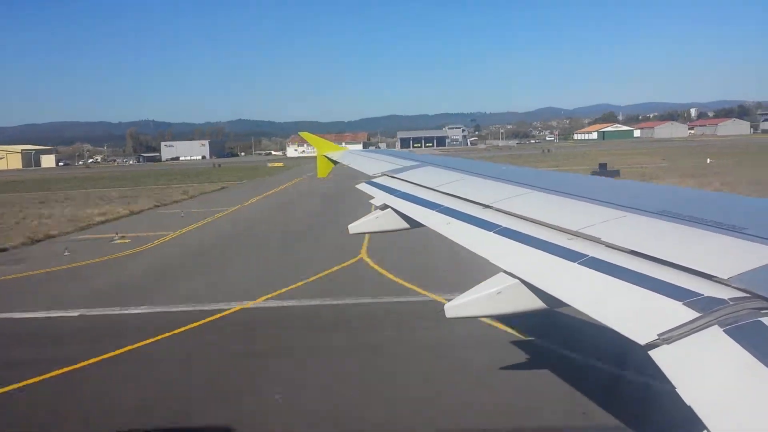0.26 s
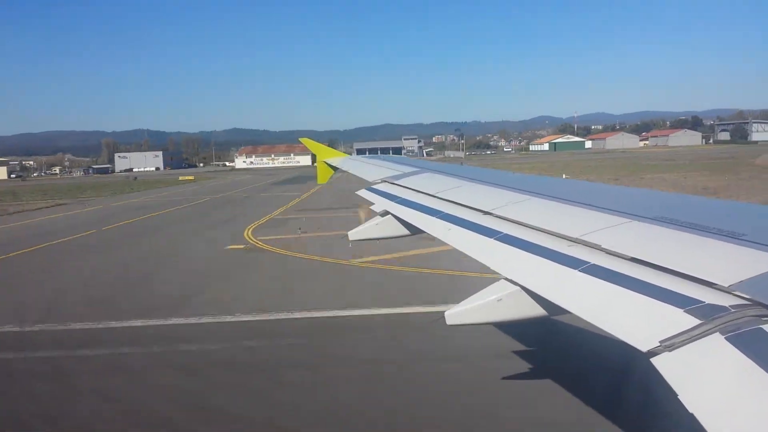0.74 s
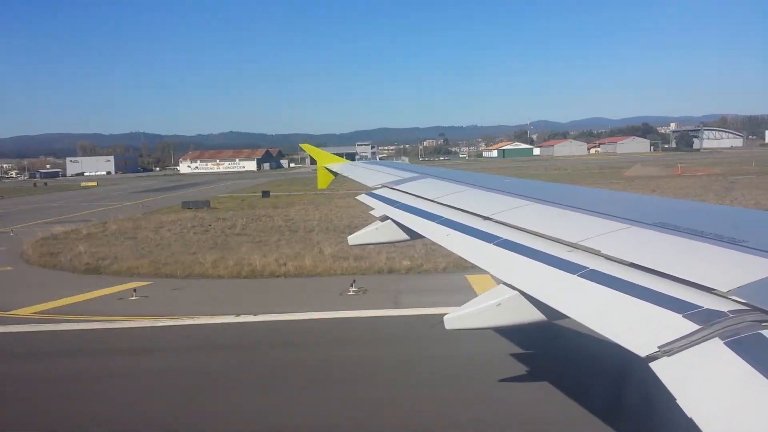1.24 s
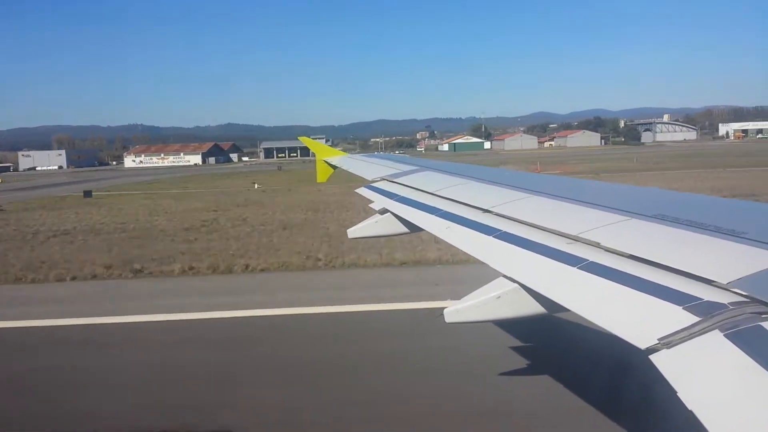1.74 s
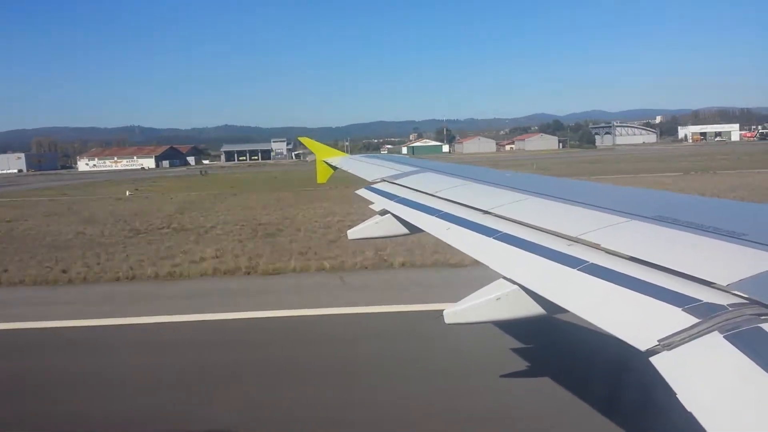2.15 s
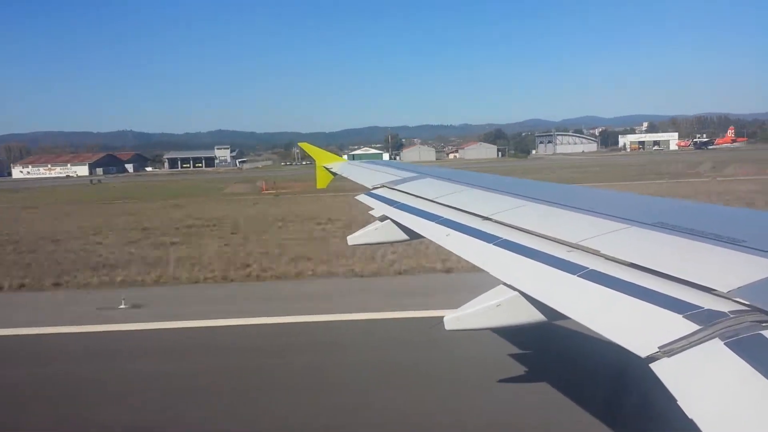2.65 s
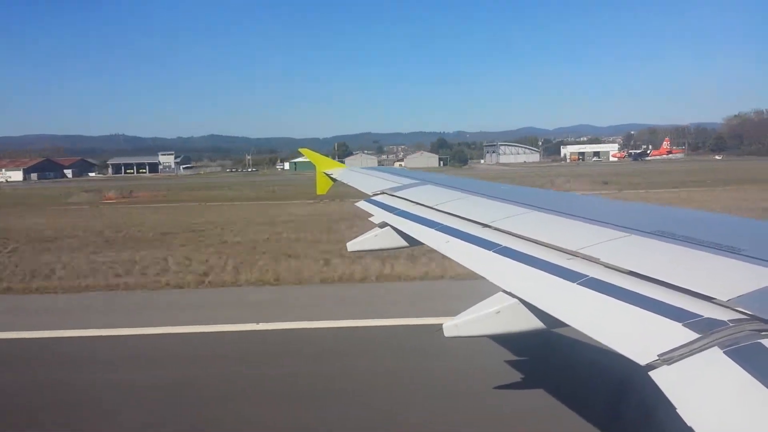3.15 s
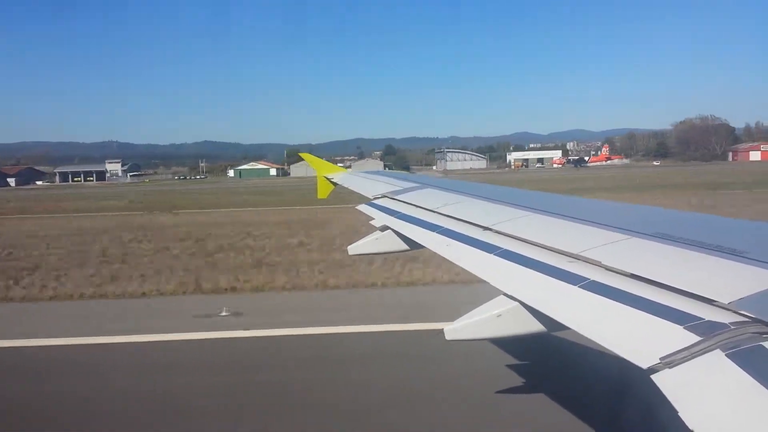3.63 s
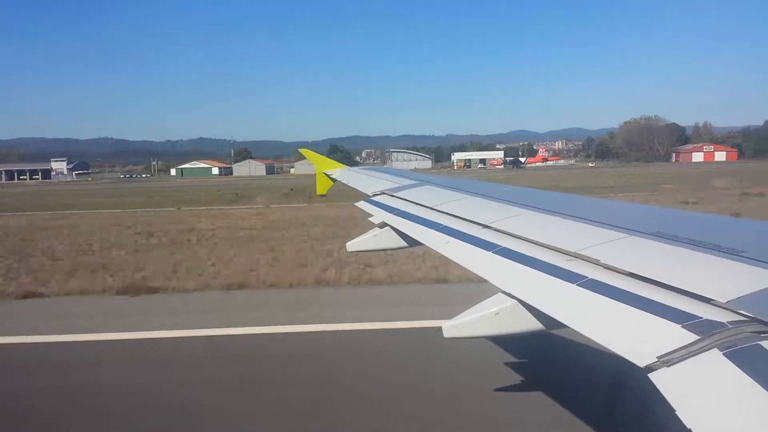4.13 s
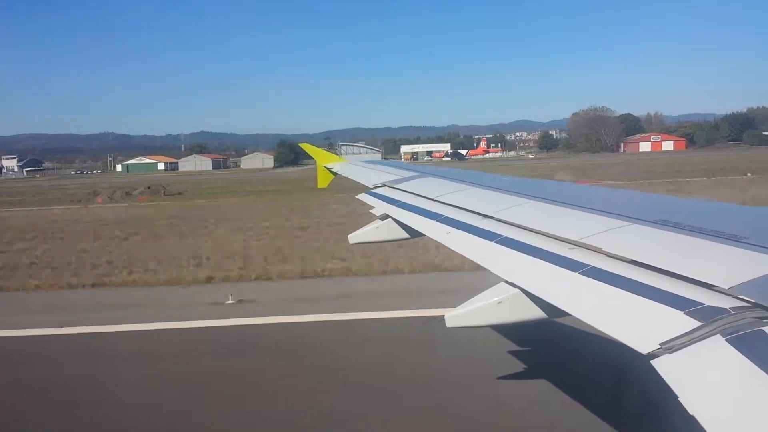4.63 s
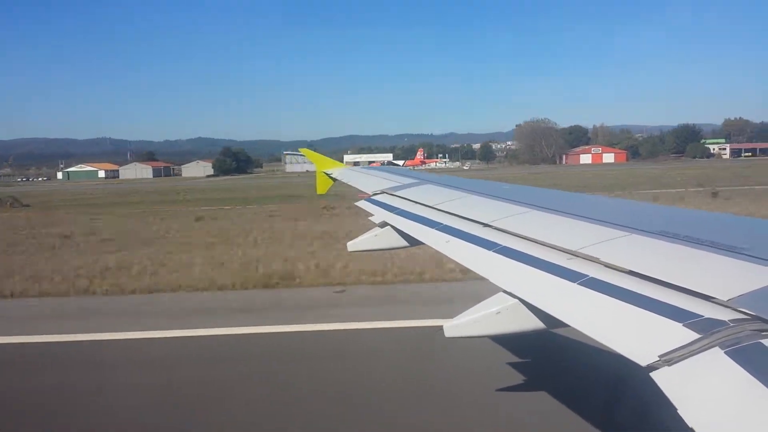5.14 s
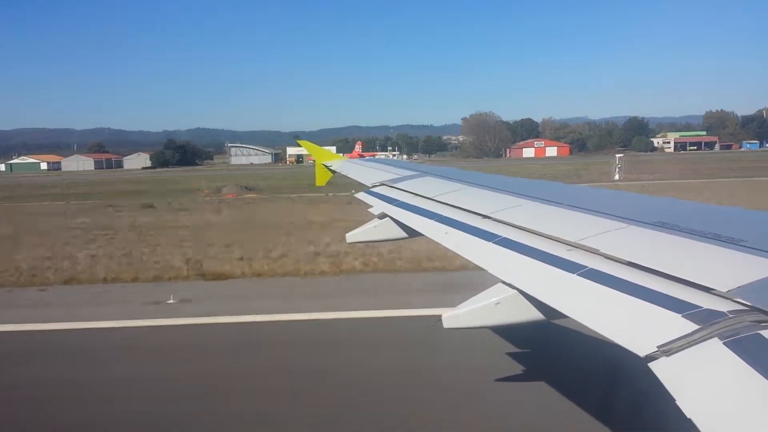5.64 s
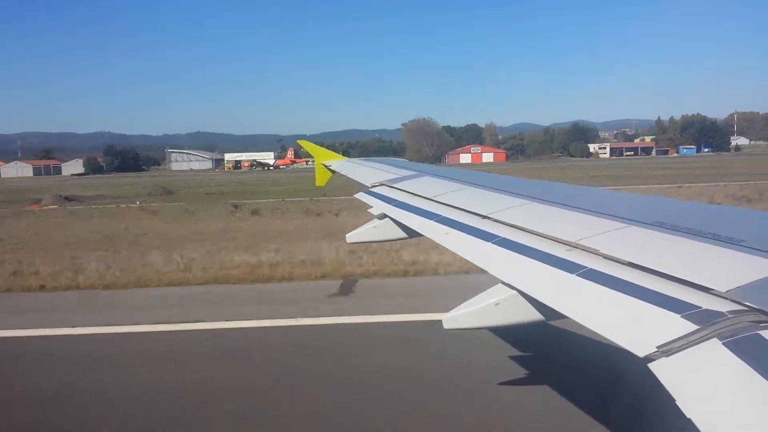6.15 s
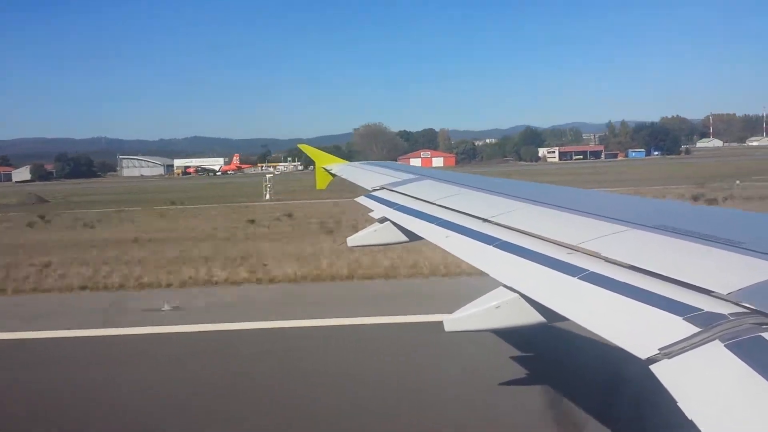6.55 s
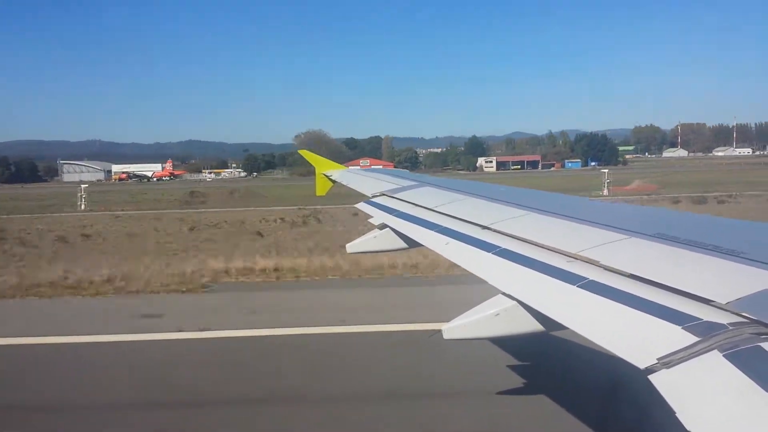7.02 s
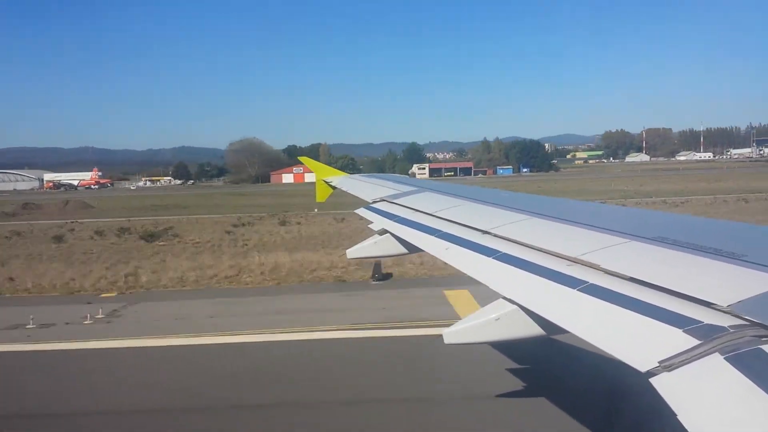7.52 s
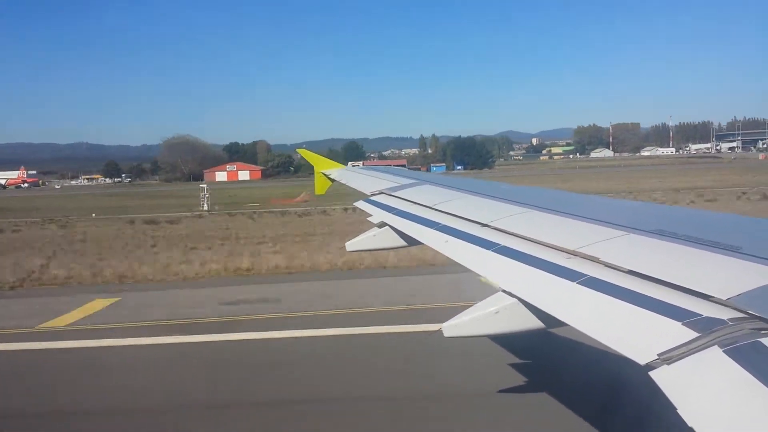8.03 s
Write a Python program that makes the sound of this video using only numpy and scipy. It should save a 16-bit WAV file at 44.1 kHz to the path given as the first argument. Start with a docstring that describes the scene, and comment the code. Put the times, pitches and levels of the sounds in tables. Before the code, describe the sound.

Inside an airliner cabin at a window over the wing during the take-off run. A loud, low roar of engines and wheels rumbles continuously, with soft air hiss and thin wavering whines. Close plastic trim snaps in quick, bright bursts during the first three seconds, eases to faint ticks, then snaps and creaks more sparsely to the end. Loose fittings rattle briefly now and then.

```python
"""Inside an airliner cabin during the take-off run, heard at a window over the wing.
From the start, filtered noise makes wheel rumble, cabin roar, resonant bands and air hiss; wavering sines whine.
Decaying modes make faint ticks of the plastic trim throughout, sharp snaps from 0.36 s and creaks from 0.59 s.
From 1.2 s loose fittings rattle now and then in short bursts of coloured noise.
Snaps and creaks pause from about 2.8 s to 4.4 s, then return until near the end."""
import sys
import numpy as np
from scipy import signal
from scipy.fft import rfft, irfft, next_fast_len
from scipy.io import wavfile
from scipy.ndimage import uniform_filter1d, minimum_filter1d, map_coordinates

SR = 44100
rng = np.random.default_rng(int(sys.argv[2]) if len(sys.argv) > 2 else 0)


def wav_out(sig):
    """Save sig, one row per channel (or a flat mono array), as 16-bit PCM at SR to the path in sys.argv[1]."""
    wavfile.write(sys.argv[1], SR, np.round(np.clip(np.atleast_2d(sig).T, -1, 1) * 32767).astype(np.int16))


N = 365148
TIME = np.arange(N) / SR
FREQ = np.maximum(np.linspace(0, SR / 2, next_fast_len(N // 2 + 1, real=True) + 1), 1)
TOP_HZ = 14800  # upper edge of the sound


def undb(db):
    """Decibel law: level to amplitude gain."""
    return 10 ** (np.asarray(db) / 20)


def unit(x):
    """Normalisation to a root-mean-square of 1 over all channels."""
    return x / np.sqrt(np.mean(x ** 2))


def sides(pan_db):
    """Interaural level difference: gains whose left minus right is pan_db."""
    return undb(np.array([[pan_db], [-pan_db]]) / 2)


def colour(hz, db, at=FREQ):
    """Spectral envelope: gain interpolated in decibels over log frequency."""
    return undb(np.interp(np.log(at), np.log(hz), db))


def noise(gain, channels=2):
    """Gaussian noise by spectral shaping: independent random spectra, multiplied by a gain."""
    shape = (channels, len(FREQ))
    spectrum = rng.standard_normal(shape) + 1j * rng.standard_normal(shape)
    return irfft(spectrum * gain)[:, :N] * np.sqrt(len(FREQ))


def walk(rate):
    """Random modulation of rms 1: random points joined by lines, about `rate` turns a second."""
    points = rng.standard_normal(N // 20)
    return unit(map_coordinates(points, [TIME * 2 * rate], order=1, mode="mirror"))


# Spectrum of engine and runway rumble through the fuselage: (frequency [Hz], relative level [dB per Hz])
FUSELAGE_SPECTRUM = [(12, -24), (22, -19), (33, -21.5), (49, -3.5), (125, -4), (180, -2), (250, -5),
                     (345, -10), (402, -19.5), (560, -20), (622, -27.5), (900, -38.5), (1100, -67),
                     (2000, -97)]
# Spectrum of the roar arriving from all round the cabin: (frequency [Hz], relative level [dB per Hz])
DIFFUSE_SPECTRUM = [(20, -19), (50, -6.5), (194, 6.5), (419, -1), (495, -3), (620, -3.5), (800, -9.5),
                    (1100, -9), (1500, -19.5), (2400, -77)]
# Uneven level of the rumble: (time [s], wheel level [dB], boom level [dB], roar level [dB])
RUMBLE_LEVELS = [(0, -22, -15, -14.5), (.25, -17.5, -12, -15.7), (.7, -16.9, -16, -15.5),
                 (1.2, -18, -12, -15), (1.55, -18, -14, -14.5), (2.25, -18.4, -12.5, -15.5),
                 (2.6, -19.5, -15, -17), (3.2, -17.5, -14.5, -17), (3.55, -17, -13.5, -14),
                 (4.2, -16.5, -12, -17), (4.6, -16.5, -12.5, -15.5), (4.95, -16, -14, -15),
                 (5.55, -18, -12, -15), (6, -17.5, -14, -14), (6.65, -15, -13, -16),
                 (7.05, -16, -13.5, -14.5), (7.5, -16.6, -13.5, -15), (8.28, -16.5, -17.5, -17)]


def roar(wheels_hz=110, split_hz=220, diffuse_db=-13.5, diffuse_pan_db=2, lean_db=3, lean_hz=520):
    """Diffraction and diffuse field: long waves reach both ports alike, shorter ones lean left and differ."""
    s, *levels_db = np.transpose(RUMBLE_LEVELS)
    wheel_gain, boom_gain, roar_gain = (undb(np.interp(TIME, s, db)) for db in levels_db)
    wall = colour(*np.transpose(FUSELAGE_SPECTRUM))

    # shares of the power below each crossover
    deep_share = 1 / (1 + (FREQ / wheels_hz) ** 10)
    low_share = 1 / (1 + (FREQ / split_hz) ** 10)
    lean = sides(lean_db) ** (1 / (1 + (lean_hz / FREQ) ** 10))

    # one channel of noise each: both ports hear the same wave
    wheels = unit(noise(wall * np.sqrt(deep_share), channels=1)) * wheel_gain
    boom = unit(noise(wall * np.sqrt(low_share * (1 - deep_share)), channels=1)) * boom_gain
    body = unit(noise(wall * np.sqrt(1 - low_share) * lean, channels=1)) * roar_gain
    around = unit(noise(colour(*np.transpose(DIFFUSE_SPECTRUM)))) * roar_gain * undb(diffuse_db)
    return wheels + boom + body + around * sides(diffuse_pan_db)


# Noisy resonances of the engine fan, the cabin and the air vents:
# (frequency [Hz], half width [Hz], level [dB], left minus right [dB], phase lead of the left port [rad])
RESONANCES = [(156, 9, -21.7, 0, 0), (181, 6, -29, 0, 0), (215, 10, -26, 0, 0), (281, 14, -25, -.5, .1),
              (505, 24, -38.5, 2, .9), (572, 14, -41, 3, -.2), (688, 10, -48.5, 5, -.5),
              (742, 16, -46.5, 6, -.7), (852, 32, -45, 5, -.1), (936, 16, -52.5, 4, -.4),
              (1050, 40, -55.5, 3, 3.1), (1170, 30, -54, 2, -.6), (1247, 37, -42.2, 0, -.6),
              (1420, 70, -56, 3, 2.8), (1550, 35, -61, 3, 2.9), (1665, 32, -58.5, 5, 1.5),
              (1900, 70, -60.5, 2, -2.4), (3180, 70, -67, -3, 0), (3480, 150, -64, -6, 0),
              (4850, 110, -65, -1, 0), (7290, 100, -63.5, -3, 0), (8450, 150, -65.5, -8, 0),
              (9760, 280, -60.5, -9, 0)]


def resonances(alike_hz=2400, most_apart=3, swell_db=.25, swell_rate=3.6):
    """Resonance and coherence: turbulence rings narrow bands, and the ports agree less as pitch rises."""
    out = 0
    for hz, width, db, pan_db, lead in RESONANCES:
        peak = 1 / (1 + ((FREQ - hz) / width) ** 2)
        shared = noise(peak * np.exp(1j * np.array([[lead], [0]])), channels=1)
        apart = min((hz / alike_hz) ** 2, most_apart)
        band = shared + apart * noise(peak)
        wavering = band * undb(swell_db * walk(swell_rate))
        out = out + unit(wavering) * undb(db) * sides(pan_db)
    return out


# Whines of spinning machinery: (frequency [Hz], level before swells [dB], left minus right [dB])
WHINE_TONES = [(1593, -60.5, 3), (2125, -68, 0), (2429, -62.5, -4.5), (7289, -69, -4)]
# Passing swells of a whine: (frequency of the whine [Hz], crest time [s], half length [s], rise [dB])
WHINE_SWELLS = [(1593, 0.3, .2, 8), (1593, 4.3, .17, 2), (1593, 5.9, .5, 9), (1593, 7.9, .2, 6),
                (1593, 7.72, .2, 5), (2429, 2.92, .12, 3), (2429, 3.45, .17, 9), (2429, 3.75, .17, 5),
                (2429, 4.5, .2, 6), (2429, 7.82, .17, 9.5)]


def whines(drift=0.0008, flutter_db=2.0, lag_rad=1.76):
    """Frequency and amplitude modulation: thin tones waver in pitch, swell, and flutter at each port."""
    out = 0
    lag = np.array([[lag_rad], [0]])  # the left port lags in phase
    for hz, db, pan_db in WHINE_TONES:
        phase = 2 * np.pi * np.cumsum(hz * (1 + drift * walk(22.6))) / SR
        flutter = undb(flutter_db * np.array([walk(5.5), walk(7.2)]))
        tone = np.sin(phase - lag) * flutter
        swell_db = 0
        for own_hz, crest, half, rise_db in WHINE_SWELLS:
            if abs(own_hz - hz) < hz / 10:
                swell_db = swell_db + rise_db * np.exp(-((TIME - crest) / half) ** 2)
        out = out + unit(tone) * undb(db + swell_db) * sides(pan_db)
    return out


# Spectrum of the cabin air before its level curve: (frequency [Hz], left [dB per Hz], right [dB per Hz])
AIR_SPECTRUM = [(400, -64.5, -75.5), (1000, -78, -84), (1670, -73, -78.5), (1780, -79.5, -79),
                (1970, -79, -78.5), (2920, -85, -84.5), (3060, -84.5, -82.5), (3990, -89, -87),
                (6070, -84, -90.5), (6900, -87, -85.5), (7730, -89.5, -86), (10890, -103, -88.5),
                (11460, -110, -102), (15000, -118, -112)]
# Level curve added to the hiss: (time [s], level [dB])
HISS_LEVEL = [(0, 2), (.9, 1.5), (2.6, 1.5), (3.15, -1), (3.5, 2.5), (4.3, 0.5), (5.8, 2.5), (7.1, 1),
              (7.8, 2.5), (8.28, -0.5)]


def air(flicker_db=1.34):
    """Broadband flow noise: ventilation and slipstream hiss, independent and coloured apart at each port."""
    hz, left_db, right_db = np.transpose(AIR_SPECTRUM)
    density = np.array([colour(hz, left_db), colour(hz, right_db)])
    hiss = noise(density) * np.sqrt(SR / 2)  # level per Hz to amplitude over the whole band
    return hiss * undb(np.interp(TIME, *np.transpose(HISS_LEVEL)) + flicker_db * walk(27))


# Modes of the trim before scatter: (frequency [Hz], 60 dB decay time [s], left level [dB], right level [dB])
PLASTIC_MODES = [(2100, 0.0024, -14, -3), (3250, 0.0058, -20, -9), (4390, 0.0069, -20, -9),
                 (5200, 0.0012, 0.5, -23), (6270, 0.0021, -0.5, -16), (7400, 0.0023, -20, 6.5),
                 (8440, 0.00087, -6, 7), (9640, 0.0019, -27, 6.5), (11040, 0.0015, -18, -7),
                 (13000, 0.0018, -13, -6), (14300, .002, -16, -21)]


def slip(scatter_db=1.2, detune=0.012, spot_shift=.015, tail_db=-24, tail_s=0.0012, radiate_hz=3600):
    """Modal decay: a release of stuck plastic rings its modes, and nearby surfaces scatter a short tail."""
    t = TIME[:SR // 50]
    hz, t60, *port_db = np.transpose(PLASTIC_MODES)
    mode_detune, mode_scatter = rng.standard_normal((2, len(hz)))
    # the spot that slips shifts all modes together
    hz = hz * (1 + detune * mode_detune + spot_shift * rng.standard_normal())
    decay = np.exp(-np.log(1000) * np.outer(1 / t60, t))
    rings = np.sin(2 * np.pi * np.outer(hz, t)) * decay
    polarity = (-1) ** np.arange(len(hz))
    direct = undb(np.array(port_db) + scatter_db * mode_scatter) * polarity @ rings
    # so small a part radiates little below its modes
    direct = signal.lfilter(*signal.butter(2, radiate_hz, "high", fs=SR), direct)
    scatter = rng.standard_normal(direct.shape) * np.exp(-t / tail_s) * undb(tail_db)
    click = direct + signal.fftconvolve(direct, scatter, axes=1)[:, :len(t)]
    return click / np.sqrt(np.sum(click ** 2))  # unit energy over both ports


def add(out, sound, s):
    """Superposition: mix a short sound in at time s."""
    start = int(np.clip(s * SR, 0, N - 1))
    out[:, start:start + sound.shape[1]] += sound[:, :N - start]


def ticks(faint_db=-26, spread_db=-2.0, count=60):
    """Random shot process: faint single slips fall at uniform random times as the cabin shakes."""
    out = np.zeros((2, N))
    for _ in range(count):
        gain = undb(faint_db + spread_db * rng.standard_normal())
        add(out, slip() * gain, rng.uniform(0, N / SR))
    return out


# Sharp snaps of the trim, alone or in quick runs: (time [s], energy level [dB])
SNAP_EVENTS = [(.3583, -10), (.3656, -11), (.3748, -14), (.3781, -14), (.403, -13), (.4069, -12),
               (.4099, -7), (.4162, -13), (.4217, -11), (.4264, -12), (.4352, -14), (.4392, -13),
               (.4522, -13), (.4637, -12), (.466, -7), (.4743, -13), (.4835, -9), (.5387, -13),
               (0.566, -5.5), (.5692, -9), (.5731, -5), (.5803, -12), (.6017, -11), (.7183, -11),
               (0.7296, -9), (.7336, -15), (0.738, -8), (.7433, -13), (.7466, -14), (0.773, -10),
               (.7774, -12), (0.7803, -5), (.7873, -5), (.7942, -9), (.8095, -9), (.9902, -15),
               (.9973, -13), (1.0001, -12), (1.0077, -14), (1.0357, -12), (1.0434, -11), (1.0543, -16),
               (1.5202, -10), (1.5268, -8.5), (1.6092, -7), (1.7925, -12), (1.8232, -16), (1.8305, -15),
               (1.84, -6), (1.8697, -11), (1.8793, -11), (1.8965, -5), (2.0568, -7), (2.0676, -8),
               (2.0763, -7.5), (2.08, -5), (2.0899, -11), (2.0934, -9), (2.1292, -4), (2.2301, -7),
               (2.2451, -7), (2.249, -11), (2.2525, -5), (2.2569, -8), (2.2606, -10), (2.269, -7),
               (2.3114, -15), (2.5348, -15), (2.5427, -4), (2.552, -15), (2.5595, -14), (2.5724, -10),
               (2.6018, -12), (2.6235, -12), (2.691, -6.5), (2.708, -11), (4.4674, -13), (4.6135, -7),
               (4.619, -10), (4.6216, -4.5), (4.7641, -14), (4.8204, -15), (5.5158, -11), (5.5227, -13),
               (5.5338, -15), (5.66, -13), (5.6769, -17), (5.6917, -14), (5.8305, -19), (5.8625, -14),
               (6.0545, -12), (6.0603, -11), (6.2461, -12), (6.2542, -14), (7.309, -10), (7.6629, -6),
               (7.6672, -14), (7.671, -10), (7.7707, -14), (7.9579, -12), (7.9654, -13)]


def snaps(after_db=-17, after_s=0.0022):
    """Sudden strain release: the strongest slips, each followed by a faint rebound."""
    out = np.zeros((2, N))
    for s, db in SNAP_EVENTS:
        add(out, slip() * undb(db), s)
        delay = after_s * np.exp(rng.standard_normal() / 2)
        add(out, slip() * undb(db + after_db), s + delay)
    return out


# Creaks of the trim, each a run of slips:
# (start [s], length [s], energy level of the first slip before random spread [dB])
CREAK_RUNS = [(0.59, .026, -23), (1.8, .063, -21), (2.282, .03, -18), (2.717, .017, -18), (4.77, .02, -21),
              (4.816, .04, -18.5), (5.307, .002, -24), (5.496, .047, -22), (5.62, .02, -22),
              (5.672, .03, -18), (5.824, .025, -21.5), (5.879, .02, -21), (6.014, .03, -22),
              (6.108, .025, -20), (6.229, .028, -18), (7.34, .008, -15), (7.369, .04, -18),
              (7.754, .029, -21), (7.928, .018, -20)]


def creaks(after_db=-11, after_s=0.0036, count=12):
    """Stick-slip friction: an uneven run of up to `count` weakening slips, each setting off a fainter one."""
    gap_s, jitter = .0065, 0.39  # typical sticking time, which sets the slip count; log spread of gaps
    spread_db, relax_db = -4, -5  # slips differ in strength, and weaken as the strain is let out
    out = np.zeros((2, N))
    for start, length, db in CREAK_RUNS:
        clicks = [slip() for _ in range(count)]
        stick, strength, rebound = rng.standard_normal((3, count))
        slips = int(np.clip(1 + round(length / gap_s), 1, count))
        strain = np.cumsum(np.exp(jitter * stick[:slips]))
        progress = (strain - strain[0]) / max(strain[-1] - strain[0], 1e-9)
        for k, part in enumerate(progress):
            s = start + part * length
            gain = undb(db + relax_db * part + spread_db * strength[k])
            add(out, clicks[k] * gain, s)
            delay = after_s * np.exp(rebound[k] / 2)
            add(out, clicks[-1 - k] * gain * undb(after_db), s + delay)
    return out


# Loose fittings that knock and chatter: (crest time [s], level [dB], rise constant [s], decay constant [s],
# left minus right [dB], brightness [dB per octave], ring frequency [Hz], ring height [dB])
RATTLE_EVENTS = [(1.227, -33, .002, .0012, -6, 7, 13500, 11), (1.2354, -22, .0003, 0.0033, -3, 3, 6000, 2),
                 (2.471, -29.5, .0069, 0.014, -4, 7.5, 3070, 6), (5.077, -30, .003, .01, -4, 2.5, 1350, 7),
                 (5.124, -38, .003, 0.009, -3, 0, 2700, 5), (5.738, -35, .002, 0.015, -6, 5, 3200, 9),
                 (5.773, -29, .004, 0.025, -4, -2.5, 2660, 3), (6.718, -35, .018, .008, -3, 2, 1900, 10),
                 (7.566, -32, .002, .0059, 0, -1, 4300, 10)]
# Spectrum common to the fittings: (frequency [Hz], relative level [dB per Hz])
FITTING_SPECTRUM = [(600, 4), (1300, 15), (2100, -0.5), (2700, -1.5), (3300, -1), (4600, -7), (6200, -5),
                    (10000, -10), (12500, -19), (15000, -27)]


def rattles(size=8192, ring_width=0.091):
    """Dense impacts as enveloped noise: each fitting chatters with its own brightness and ring."""
    out = np.zeros((2, N))
    t = TIME[:size] - TIME[size // 2]
    freq = np.clip(np.linspace(0, SR / 2, size // 2 + 1), 1, TOP_HZ)
    common = colour(*np.transpose(FITTING_SPECTRUM), at=freq)
    octaves = np.log2(np.maximum(freq, FITTING_SPECTRUM[0][0]))
    for s, db, rise, decay, pan_db, tilt_db, ring_hz, ring_db in RATTLE_EVENTS:
        gain = common * undb(tilt_db * octaves)
        # ring width is a share of the ring frequency
        ring = undb(ring_db * np.exp(-((freq / ring_hz - 1) / ring_width) ** 2))
        chatter = unit(irfft(rfft(rng.standard_normal((2, size))) * gain * ring))
        envelope = np.exp(-np.maximum(-t / rise, t / decay))
        add(out, chatter * envelope * undb(db) * sides(pan_db), s + t[0])
    return out


def scene():
    """Linear superposition of everything heard at the window seat."""
    return roar() + resonances() + whines() + air() + ticks() + snaps() + creaks() + rattles()


def record(dry, ceiling=.94, hold_s=.008):
    """Look-ahead limiting and low-pass filtering: the highest peaks are held down, then the top is cut."""
    size = int(hold_s * SR) + 1
    headroom = np.minimum(1, ceiling / (np.abs(dry).max(axis=0) + 1e-9))
    held = minimum_filter1d(headroom, 2 * size)
    gain = uniform_filter1d(uniform_filter1d(held, size), size)
    low_pass = signal.ellip(8, .2, 70, TOP_HZ, fs=SR, output="sos")
    return signal.sosfilt(low_pass, dry * gain)


dry = scene()
out = record(dry)
wav_out(out)
```